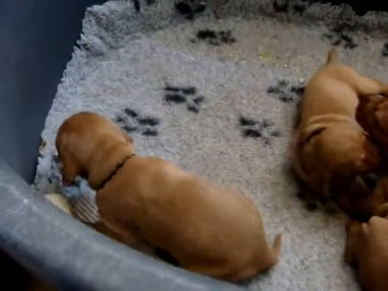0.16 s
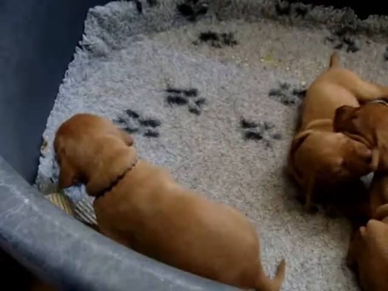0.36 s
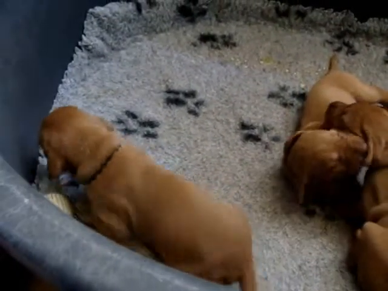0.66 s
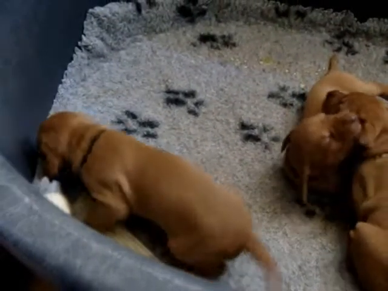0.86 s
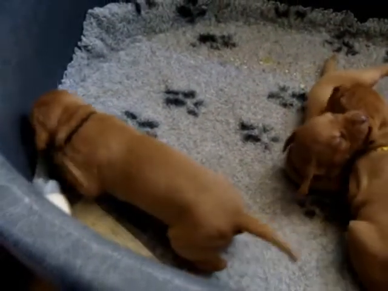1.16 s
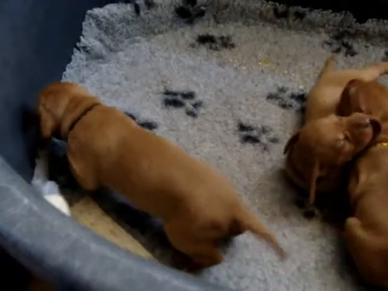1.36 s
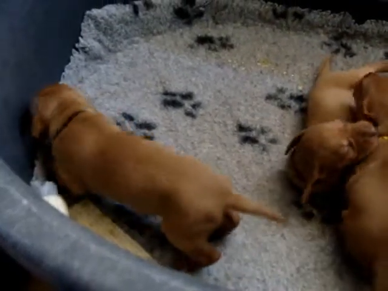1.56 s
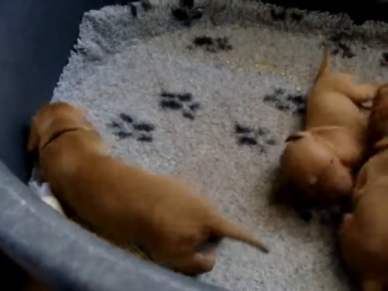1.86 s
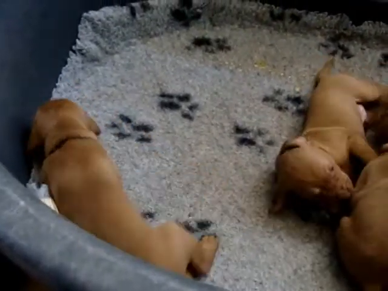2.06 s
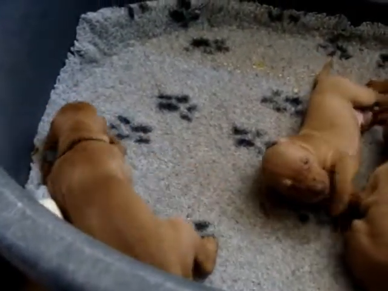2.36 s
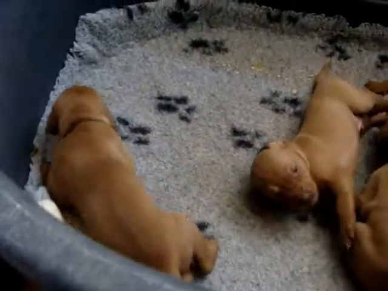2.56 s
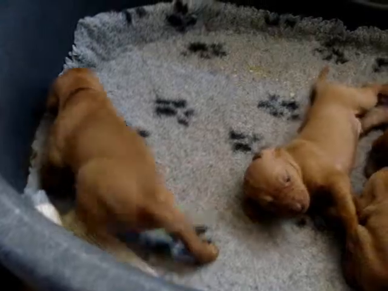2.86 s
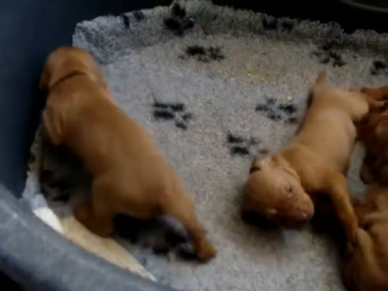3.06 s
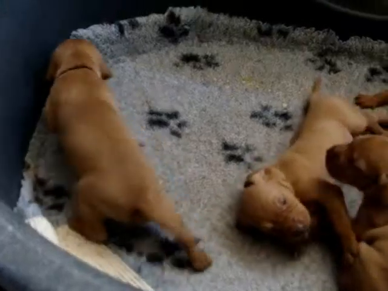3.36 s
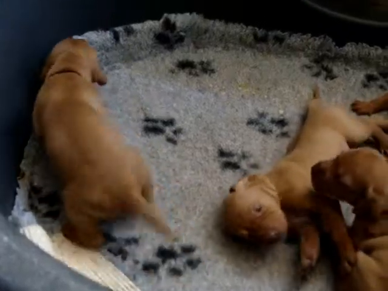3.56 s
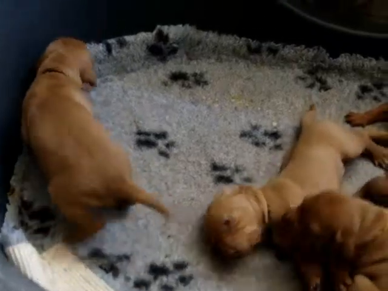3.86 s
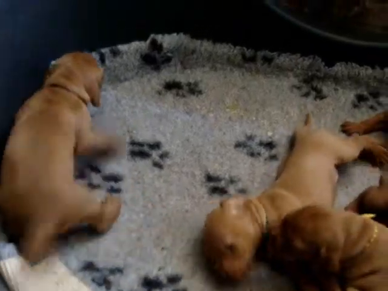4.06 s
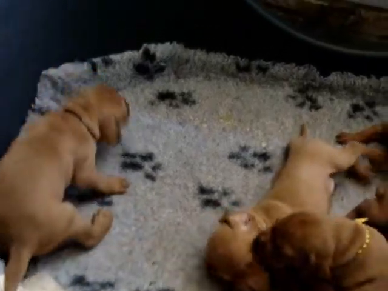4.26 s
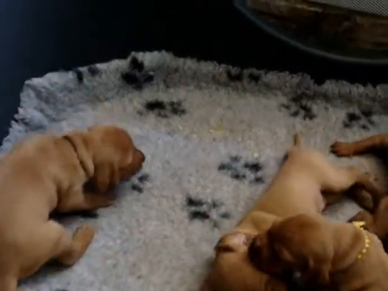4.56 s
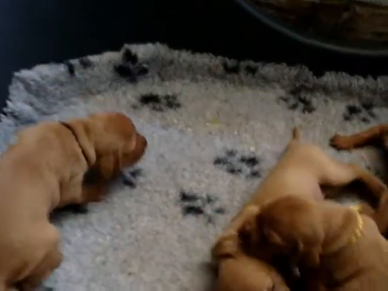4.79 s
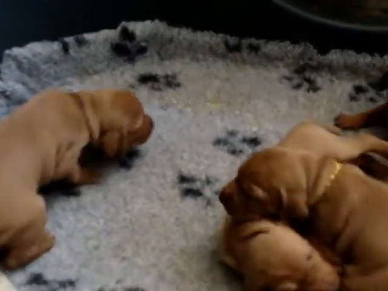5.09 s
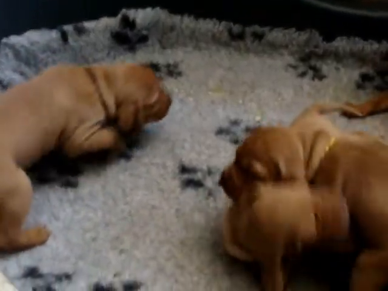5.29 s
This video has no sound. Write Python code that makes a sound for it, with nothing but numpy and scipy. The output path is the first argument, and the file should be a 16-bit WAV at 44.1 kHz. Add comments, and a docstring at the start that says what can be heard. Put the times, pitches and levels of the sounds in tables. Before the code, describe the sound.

Indoors, close to a plastic box padded with fleece, steady soft room noise runs throughout. In the first 0.7 s fur and paws scuff the blanket, claws tick on plastic, padded bumps land and a puppy whimpers very faintly. From 0.8 to 1.7 s come small throaty grumbles and grunts, with a brighter little woof at about 1.1 s and ticks near 1.4. Between 1.7 and 2.5 s rubbing, ticks and dull thumps at 2.2-2.4 suggest tumbling; two low, faint grunts follow at 2.6-2.7. At 2.85 s a sudden, extremely loud yelp rises to a shrill squeal, overloads the microphone, drops into a groan by 3.1 and rings briefly. Small grunts follow at 3.25 and 3.6 s. A trembling whine, broken into quick bursts, with a snarl beneath and ticks, spans 3.8-4.0. A low, rough growl falls and closes from 4.2 to 5.0 s. A soft thump and faint grumble end it at 5.2-5.5.

```python
"""Young puppies wrestle on a fleece blanket in a plastic whelping box, indoors.
They grumble, grunt and growl: pulses from the vocal folds ring in throats of changing shape.
One gives a sharp yelp, topped by a squeal, that rings in the room and overloads the microphone.
Paws scuff (shaped noise), bodies thump (dying sines), claws tick on the box (bursts of noise that ring),
and a littermate whimpers faintly (gliding tones) over a steady room tone."""
import sys
import numpy as np
from scipy import signal
from scipy.fft import rfft, irfft
from scipy.io import wavfile
from scipy.ndimage import uniform_filter1d, minimum_filter1d

SR = 44100
rng = np.random.default_rng(int(sys.argv[2]) if len(sys.argv) > 2 else 0)


def materialize(psi):
    """Save the field psi as 16-bit PCM at rate SR to the path in sys.argv[1].

    A 1-D psi becomes a single channel; in a 2-D psi each row is a channel.
    """
    bounded = np.clip(np.atleast_2d(psi).T, -1, 1)
    quanta = np.round(bounded * 32767).astype(np.int16)
    wavfile.write(sys.argv[1], SR, quanta)


N = 239497

# vocal folds in the yelp, the whine and the long growl: [t/s, f/Hz, roughness 0-1]
YELP_FOLDS = [(2.845, 345, .6), (2.878, 390, .6), (2.895, 590, .85), (2.92, 730, .72), (2.96, 690, .28),
              (2.98, 612, .15), (3.01, 435, .4), (3.06, 285, .6)]
WHINE_FOLDS = [(3.795, 520, .3), (3.82, 468, .3), (3.88, 415, .4), (3.92, 470, .9), (4.02, 435, .6)]
GROWL_FOLDS = [(4.19, 162, .65), (4.26, 175, .4), (4.31, 172, .75), (4.44, 175, .6), (4.52, 152, .85),
               (4.61, 148, .6), (4.68, 140, .35), (4.76, 135, .45), (4.85, 148, .12), (4.98, 126, .1)]
# effort of those calls, before voice() trims each band; the whine's levels are those at its tremor crests:
# [t/s, throat level/dB below 1 kHz, mouth level/dB at 1-3.2 kHz, hiss level/dB above]
YELP_EFFORT = [(2.845, -21.5, -64, -81), (2.862, -5, -38, -62), (2.887, -10.5, -8, -15.5),
               (2.909, -57, -6, -14), (2.954, -28, -16.5, -20), (2.981, -28.5, -10.5, -48),
               (2.992, -28, -41, -34), (3.018, -22, -22, -37.5), (3.06, -44, -28, -40)]
WHINE_EFFORT = [(3.798, -13.5, -33, -65), (3.821, -20.5, -41.5, -40), (3.882, -20.5, -38, -33.5),
                (3.899, -30, -34.5, -38), (3.975, -18, -42, -50), (4.019, -30, -32, -43)]
GROWL_EFFORT = [(4.195, -34.5, -45, -50.5), (4.22, -30, -34, -50), (4.42, -31, -37.5, -52),
                (4.74, -36, -40, -50), (4.9, -35, -34.5, -54.5), (4.98, -50, -72, -61)]
# resonances of the throat and mouth, as relative spectra: [f/Hz, level/dB]
GRUMBLE_THROAT = [(71, -39), (120, -28), (155, -4), (198, -0.5), (292, 0.5), (623, -13), (736, 1),
                  (919, -21), (1210, -11.5), (1460, -19), (1720, -12.5), (2740, -35), (10000, -36),
                  (13000, -77), (22000, -120)]
WOOF_THROAT = [(110, -53), (200, -17), (370, -9.5), (560, -11.5), (740, -13.5), (950, -23.5), (1250, -17),
               (1600, -21.5), (2300, -40), (4100, -54), (5150, -35), (6400, -50), (8300, -37), (10000, -67)]
GRUNT_THROAT = [(88, -47), (150, 1), (282, 4.5), (387, 4.5), (591, -4.5), (782, -7), (869, -6.5),
                (1050, -17), (1150, -5), (1580, -13), (3420, -40), (8390, -37), (10000, -44), (13000, -87),
                (22000, -120)]
YELP_THROAT = [(150, -32), (380, -23.5), (500, -9), (670, 2.5), (800, -2.5), (1020, -7), (1240, -1),
               (1480, -5), (1700, 1), (2300, -12), (2560, -8.5), (2800, -11.5), (3300, -21.5),
               (4700, -22.5), (6500, -37), (10000, -55.5)]
GROAN_THROAT = [(100, -55), (170, -9), (284, -4), (600, -9.5), (762, -2.5), (968, -15), (1230, -1.5),
                (1950, -20), (2430, -22), (6530, -18), (10000, -46), (13000, -96), (22000, -120)]
HUFF_THROAT = [(76, -34), (130, 14.5), (187, 4), (255, 1), (341, 11), (731, 11.5), (1090, -5), (1650, -3.5),
               (2100, -7), (3360, -29.5), (4030, -25), (4500, -51), (5110, -27), (6700, -35), (10000, -32),
               (13000, -73), (22000, -120)]
WHINE_THROAT = [(150, -67), (250, -17), (379, 9.5), (449, -1), (661, -2.5), (736, -44), (1100, -15),
                (1410, -39), (1600, -19), (2300, -27), (2780, -20.5), (3720, -42), (4020, -34), (4840, -46),
                (6290, -40), (10000, -44), (13000, -93), (22000, -120)]
SNARL_THROAT = [(47, -56), (80, -20), (172, -8.5), (291, -7), (437, -4.5), (641, -9), (753, -11.5),
                (817, -16), (1200, -17.5), (1350, -21), (2530, -19), (3700, -34), (5300, -30), (5750, -28),
                (6160, -22), (6810, -35), (10000, -37), (13000, -99), (22000, -120)]
GROWL_THROAT = [(65, -76), (110, -15.5), (157, -1), (262, 5.5), (288, -2), (341, 10), (382, 7), (613, -3),
                (768, 2.5), (1120, -24), (1380, -26.5), (1540, -17.5), (1660, -24), (1860, -21.5),
                (2430, -29.5), (3220, -54.5), (5470, -46.5), (10000, -50.5), (13000, -75), (22000, -120)]
CLOSING_THROAT = [(100, -35), (140, -7), (270, 3), (420, 3.5), (560, -2.5), (850, -6.5), (1000, -19),
                  (1300, -30.5), (1600, -18.5), (2000, -37), (3200, -56), (5600, -32.5), (6700, -42.5),
                  (8000, -36), (10000, -50.5)]
# short growls and grunts, levels at full effort before the band trims:
# [start t/s, attack/s, hold/s, release/s, start f/Hz, top f/Hz, end f/Hz, roughness (1 is the most used),
#  throat level/dB, mouth level/dB, hiss level/dB, throat shape]
GRUNTS = [(0.788, 0.16, 0.026, 0.12, 139.8, 163, 144, 0.59, -41, -45.5, -56, GRUMBLE_THROAT),
          (0.967, 0.022, 0.062, 0.063, 152, 154, 133, 0.27, -46.5, -53.5, -53, GROWL_THROAT),
          (1.1, 0.033, .022, 0.054, 334.1, 384, 278, .55, -22, -34.5, -38.5, WOOF_THROAT),
          (1.371, .035, 0.047, 0.069, 237.8, 298, 210, 0.38, -27.5, -39.5, -49, GRUNT_THROAT),
          (1.569, 0.026, 0.016, 0.065, 205.2, 245, 150, 0.21, -33.5, -43.5, -49, GRUNT_THROAT),
          (1.66, 0.013, 0.034, 0.061, 168.4, 155, 132, 0.7, -44, -48, -54, GRUNT_THROAT),
          (2.609, 0.026, 0.049, 0.064, 59.74, 59, 48, 0.89, -43.5, -40.5, -60, GROWL_THROAT),
          (2.699, 0.022, 0.0052, 0.076, 128, 140, 117, 0.3, -35.5, -38, -53.5, GROWL_THROAT),
          (3.019, 0.031, .1, .045, 348, 272, 215, 1.1, -31.5, -36, -52.5, GROAN_THROAT),
          (3.243, 0.051, .012, 0.035, 120.3, 112, 100, 0.76, -40.5, -41.5, -58.5, GROWL_THROAT),
          (3.603, 0.012, 0.041, 0.058, 182.3, 183, 145, 0.3, -31, -38, -50.5, HUFF_THROAT),
          (3.887, 0.059, .06, .06, 66.12, 74, 68, 0.73, -27, -38.5, -38.5, SNARL_THROAT),
          (5.289, 0.03, 0.054, 0.12, 84.4, 77, 83, 0.31, -39.5, -43.5, -55.5, GROWL_THROAT)]
# second oscillation at the top of the yelp: [t/s, f/Hz, rms level/dB]
SQUEAL = [(2.882, 1027, -11.5), (2.9, 1175, -5), (2.923, 1197, -14), (2.949, 1229, -13), (2.967, 1289, -18),
          (2.978, 1239, -1.5), (2.991, 1200, -34)]
# thin whistles through the nose, level at the middle: [start t/s, length/s, start f/Hz, end f/Hz, level/dB]
WHIMPERS = [(.24, 0.043, 660, 590, -49.5), (.3, 0.075, 720, 745, -47.5), (.41, 0.042, 845, 760, -49),
            (3.87, 0.18, 2458, 2455, -43), (5.07, 0.15, 655, 635, -61)]
# claws and teeth, and a lip smack as the huff starts at 3.602 s: [t/s, reference level/dB, ring f/Hz, time to
# die by 60 dB/s]
TICKS = [(0.053, -25, 7250, 0.012), (0.08, -30.5, 7200, .03), (.108, -38, 6500, .02),
         (0.121, -27, 2400, 0.017), (0.733, -32, 3100, 0.099), (0.744, -28, 8340, 0.051),
         (0.743, -34, 3200, 0.041), (1.376, -32.5, 2620, 0.035), (1.462, -38, 5140, 0.14),
         (1.483, -25, 1990, 0.076), (1.957, -39.5, 3070, 0.1), (2.274, -24, 3500, 0.06),
         (2.532, -24.5, 3400, 0.026), (2.629, -29.5, 6700, 0.054), (3.173, -36.5, 4400, 0.078),
         (3.447, -53, 3370, 0.034), (3.485, -39, 2900, 0.071), (3.602, -25, 1100, 0.022),
         (3.891, -28, 5240, .06), (3.959, -27.5, 6030, 0.093)]
# paws and bodies landing: [t/s, reference level/dB, ring f/Hz, time to die by 60 dB/s]
THUMPS = [(0.045, -42, 204, 0.25), (0.226, -44, 293, 0.2), (0.486, -42, 168.5, 0.19),
          (0.641, -43, 233, 0.17), (1.83, -45.5, 137.6, 0.16), (2.227, -33.5, 81.5, 0.15),
          (2.269, -36, 324, 0.093), (2.39, -38.5, 320, 0.08), (3.388, -34, 590, 0.03),
          (4.14, -39, 744, 0.13), (5.211, -38, 222, 0.084)]
# rubbing on the blanket, before scuff() trims it: [middle t/s, length/s, dull level/dB, bright level/dB]
SCUFFS = [(0.008, 0.13, -38.5, -50.5), (0.116, .08, -54, -47), (0.496, 0.22, -46, -66),
          (0.661, 0.07, -43.5, -54), (0.756, 0.061, -47, -65), (1.726, 0.16, -44.5, -51.5),
          (1.993, 0.089, -49.5, -60), (2.131, .15, -46.5, -47), (2.279, 0.075, -38.5, -51.5),
          (2.399, 0.061, -52, -62), (2.477, 0.086, -58, -44)]
# relative spectra of the dull rub and of the bright fibres: [f/Hz, level/dB]
SCUFF_DULL = [(71, -25), (120, -8), (156, 4), (271, 8), (672, -4.5), (763, -1.5), (857, 0.5), (993, -35),
              (1080, -60), (1500, -3.5), (1950, -67), (3300, -120)]
SCUFF_BRIGHT = [(710, 1), (1200, 4), (1700, 3), (2170, 12), (3050, 2.5), (3540, -1.5), (7600, -3),
                (10000, -23), (13000, -72), (22000, -120)]
# first echoes off the box walls: [delay/s, level/dB]
WALL_ECHOES = [(.0029, -37), (.0074, -22.5), (.0116, -12)]
# time for the room's tail to die by 60 dB: [f/Hz, time/s]
ROOM_T60 = [(150, 0.56), (600, 0.38), (2000, 0.55), (8000, 0.04)]
# relative spectrum of the room tone: [f/Hz, level/dB]
ROOM_TONE = [(15, 1), (25, -2), (164, -4), (245, -0.5), (546, -4), (651, 6), (737, -2), (924, -2.5),
             (1250, -4), (1420, -5), (1600, -3.5), (2170, -5.5), (2930, -6.5), (3670, -9), (10000, -17),
             (13000, -111), (22000, -120)]

ROOM_TONE_DB = -49  # rms, ahead of record()
THROAT_TOP_HZ, MOUTH_TOP_HZ = 1000, 3200  # the voice's three bands meet here
TOP_HZ, CUTOFF_HZ = 10200, 15700  # steep upper edges, before and after the loud peaks are flattened
# the whine shakes: rate, depth in throat, mouth and hiss, delay of a crest from its start
WHINE_TREMOR_HZ, WHINE_TREMOR_DB, WHINE_CREST_S = 33.5, (14, 1, 19), 0.02
SWELL_DB, FADE_DB, FADE_CURVE = 10, 14.5, 0.87  # effort gained in attack, lost in release; its bend
MOUTH_FOLLOWS, HISS_FOLLOWS = 1.3, 1.0  # dB per dB of effort
SLACK_ROUGHNESS = 0.14  # extra roughness as the folds start and stop
PITCH_ARCH = 1.4  # 1 is a pointed arch, 2 a round one
ARCH_DB = 7  # whimpers and scuffs are this much weaker at their ends
FLUTTER_SHARE = .41  # rate of the slower vibration, as a share of the squeal's pitch


def cry(fold_rows, effort_rows, *throats):
    """A call whose pitch, roughness and effort change as it goes, through one or more throat shapes."""
    t, gate = span(effort_rows[0][0], effort_rows[-1][0])
    pitch, rough = curves(fold_rows, t)
    return t[0], gate * voice(t, pitch, rough, curves(effort_rows, t), throats)


def squeal(depth=0.2, octave=1.45, mellow_s=0.058, unsteady=0.021):
    """A high tone that starts shrill and mellows; a slower vibration chops it into side tones."""
    start = SQUEAL[0][0]
    t, gate = span(start, SQUEAL[-1][0])
    pitch, db = curves(SQUEAL, t)

    def unsteady_phase(hz):
        """Phase of a vibration whose pitch strays a little."""
        return 2 * np.pi * np.cumsum(hz * (1 + unsteady * wander(len(t), 180))) / SR

    phase = unsteady_phase(pitch)
    flutter = 1 + depth * np.sin(unsteady_phase(FLUTTER_SHARE * pitch))
    shrill = octave / (1 + ((t - start) / mellow_s) ** 4)
    tone = (np.sin(phase) + shrill * np.sin(2 * phase)) * flutter
    return t[0], rms_one(tone) * from_db(db) * gate


def whine():
    """A cry that a tremor of the throat breaks into bursts."""
    start = WHINE_EFFORT[0][0]
    t, gate = span(start, WHINE_EFFORT[-1][0])
    dip = np.sin(np.pi * WHINE_TREMOR_HZ * (t - start - WHINE_CREST_S)) ** 2
    levels = [db - depth * dip for db, depth in zip(curves(WHINE_EFFORT, t), WHINE_TREMOR_DB)]
    pitch, rough = curves(WHINE_FOLDS, t)
    return t[0], gate * voice(t, pitch, rough, levels, [WHINE_THROAT])


def grunt(start, attack, hold, release, start_hz, top_hz, end_hz, rough,
          throat_db, mouth_db, hiss_db, throat):
    """One push of air: effort swells, holds and fades; pitch bends, mouth follows, slack folds roughen."""
    top = start + attack + hold / 2
    end = start + attack + hold + release
    t, gate = span(start, end)
    rising = np.clip(1 - (t - start) / attack, 0, 1)
    fading = np.clip(1 - (end - t) / release, 0, 1)
    effort = -SWELL_DB * rising ** 2 - FADE_DB * fading ** FADE_CURVE
    before = np.clip((top - t) / (top - start), 0, 1)
    after = np.clip((t - top) / (end - top), 0, 1)
    pitch = top_hz + (start_hz - top_hz) * before ** PITCH_ARCH + (end_hz - top_hz) * after ** PITCH_ARCH
    roughness = np.clip(rough + SLACK_ROUGHNESS * (rising + fading), 0, 1)
    levels = throat_db + effort, mouth_db + MOUTH_FOLLOWS * effort, hiss_db + HISS_FOLLOWS * effort
    return t[0], gate * voice(t, pitch, roughness, levels, [throat])


def voice(t, pitch, rough, levels, throats, hiss_share=0.72, throat_db=1.5, mouth_db=-1.5, hiss_db=-1.5):
    """Fold pulses and hissing air ring in a throat that glides from shape to shape; effort sets three bands."""
    pulses, puffs = folds(t, pitch, rough)
    source = pulses + hiss_share * butter(puffs, 1750, "high")
    shape = np.linspace(0, len(throats) - 1, len(t))
    tone = 0
    for k, throat in enumerate(throats):
        tone = tone + colour(source, throat) * np.clip(1 - np.abs(shape - k), 0, 1)
    bands = [butter(tone, THROAT_TOP_HZ, "low", order=5),
             butter(tone, (THROAT_TOP_HZ, MOUTH_TOP_HZ), "band", order=4),
             butter(tone, MOUTH_TOP_HZ, "high", order=5)]
    # loudness follows the effort over a few cycles; single pulses stay uneven
    window = int(SR * np.clip(4 / np.median(pitch), .012, .04))
    out = 0
    for band, db, trim_db in zip(bands, levels, (throat_db, mouth_db, hiss_db)):
        power = uniform_filter1d(uniform_filter1d(band ** 2, window), window)
        gain = from_db(uniform_filter1d(db, size=130) + trim_db)
        out = out + gain * band / np.sqrt(np.abs(power) + 1e-14)
    return out


def folds(t, pitch, rough, shimmer_db=4, doubling=0.31, air=1.0):
    """One pulse a cycle; roughness unsettles time and strength, weakens every other one, lets air through."""
    jitter = .11 * rough * wander(len(t), np.mean(pitch) / 2)
    phase = np.cumsum(pitch * np.exp(jitter)) / SR
    at = np.flatnonzero(np.diff(np.floor(phase)))
    # each pulse falls between two samples and is shared by them
    late = (np.ceil(phase[at]) - phase[at]) / (phase[at + 1] - phase[at])
    shimmer = from_db(shimmer_db * rough[at] * rng.standard_normal(len(at)))
    strength = shimmer * np.sqrt(SR / pitch[at])
    strength *= 1 - np.clip(doubling * rough[at], 0, 1) * (np.arange(len(at)) % 2)
    pulses = np.zeros(len(t))
    pulses[at], pulses[at + 1] = strength * (1 - late), strength * late
    # air bursts out at each pulse and thins over the cycle
    puffs = rms_one(np.exp(-2 * (phase % 1)) * rng.standard_normal(len(t)))
    # the turbulence lies above the fundamental
    turbulence = butter(puffs, np.mean(pitch), "high")
    return pulses + air * rough * turbulence, puffs


def whimper(start, length, start_hz, end_hz, db, octave=0.16, unsteady_hz=13):
    """A thin, nearly pure tone that glides through the nose."""
    t, gain = arch(start, length)
    pitch = np.interp(t, [start, start + length], [start_hz, end_hz])
    pitch = pitch + unsteady_hz * wander(len(t), 60)
    phase = 2 * np.pi * np.cumsum(pitch) / SR
    tone = np.sin(phase) + octave * np.sin(2 * phase)
    return t[0], rms_one(tone) * from_db(db) * gain


def tick(start, db, hz, t60, width=1.15, ring_db=-9, crack_db=6, crack_s=0.00058):
    """A claw or tooth snaps onto hard plastic, or lips smack: a broad, very brief crack, then a narrow dying
    ring."""
    t = np.arange(SR // 6) / SR
    grit = rng.standard_normal(len(t))
    crack = from_db(crack_db) * butter(grit, [hz / 2, 2 * hz], "band") * np.exp(-t / crack_s)
    ring = rms_one(butter(grit, [hz / width, hz * width], "band"))
    return start, from_db(db) * (crack + ring * from_db(ring_db - 60 * t / t60))


def thump(start, db, hz, t60, rise_s=0.00076, fluff=0.25):
    """A soft landing rocks the padded floor of the box: a dying sine with some low noise."""
    t = np.arange(SR // 3) / SR
    rock = np.sin(2 * np.pi * hz * t) + fluff * wander(len(t), 2 * hz)
    return start, rock * (1 - np.exp(-t / rise_s)) * from_db(db - 60 * t / t60)


def scuff(middle, length, dull, bright, lumpy_db=4.0, grain_db=3, dull_db=-3, bright_db=-3):
    """Fur and paws drag over fleece: a lumpy rub and a fine crackle of fibres."""
    t, gain = arch(middle - length / 2, length)
    rub = colour(rng.standard_normal(len(t)), SCUFF_DULL)
    rub = rub * from_db(lumpy_db * wander(len(t), 25))
    grains = rng.standard_normal(len(t)) * from_db(grain_db * wander(len(t), 200))
    fibres = colour(grains, SCUFF_BRIGHT)
    both = from_db(dull + dull_db) * rms_one(rub) + from_db(bright + bright_db) * rms_one(fibres)
    return t[0], gain * both


def room(x, scatter_db=-7, scatter_t60=0.018, tail_db=-13, delay_s=0.011):
    """Box walls echo, the litter scatters short waves, then the room's tail dies at a rate set by pitch."""
    t = np.arange(int(.7 * SR)) / SR
    scatter = rng.standard_normal(len(t)) * from_db(-60 * t / scatter_t60) * (t > .001)
    scatter = butter(scatter, 1100, "high")
    edges = np.geomspace(80, 11000, 8)
    tail = 0
    for low, high in zip(edges, edges[1:]):
        t60, = curves(ROOM_T60, np.sqrt(low * high))
        band = butter(rng.standard_normal(len(t)), [low, high], "band")
        tail = tail + band * from_db(-60 * t / t60) * (t > delay_s)
    # the tail fills only half of the spectrum
    tail = from_db(tail_db) * rms_one(tail) / np.sqrt(2)
    echo = (from_db(scatter_db) * rms_one(scatter) + tail) / np.sqrt(len(t))
    for s, db in WALL_ECHOES:
        add(echo, s, from_db([db]))
    return x + signal.fftconvolve(x, echo)[:N]


def room_tone():
    """The steady background of the place: noise with a fixed spectrum."""
    return from_db(ROOM_TONE_DB) * rms_one(colour(rng.standard_normal(N), ROOM_TONE))


def from_db(db):
    """Decibels to gain."""
    return 10 ** (np.asarray(db) / 20)


def rms_one(x):
    """Scale to rms 1."""
    return x / np.sqrt(np.mean(x ** 2) + 1e-20)


def curves(rows, t):
    """Columns of a table, joined by straight lines, at times t."""
    s, *columns = np.transpose(rows)
    return [np.interp(t, s, column) for column in columns]


def span(start, end, fade=0.0042):
    """Sample times around a sound, and a gate that is open during it."""
    first = max(0, int((start - .03) * SR))
    last = min(N, int((end + .03) * SR))
    t = np.arange(first, last) / SR
    opening = np.clip((t - start) / fade + .5, 0, 1)
    closing = np.clip((end - t) / (2 * fade) + 1, 0, 1)
    return t, opening * closing


def arch(start, length):
    """Sample times of a soft sound, and a gain that swells and sinks over its length."""
    t, gate = span(start, start + length)
    return t, gate * from_db(-ARCH_DB * (2 * (t - start) / length - 1) ** 2)


def add(out, start, x):
    """Mix x in at a time."""
    i = int(round(start * SR))
    out[i:i + len(x)] += x[:N - i]


def butter(x, hz, kind, order=2):
    """Causal Butterworth filter."""
    return signal.sosfilt(signal.butter(order, hz, kind, fs=SR, output="sos"), x)


def wander(size, hz):
    """Slow chance with spread 1: noise below hz, taken after the filter has settled."""
    return rms_one(butter(rng.standard_normal(size + SR // 4), hz, "low")[-size:])


def colour(x, spectrum, size=4096):
    """Pass x through a causal (minimum-phase) body with this spectrum."""
    hz, db = np.transpose(spectrum)
    grid = np.maximum(np.fft.rfftfreq(size, 1 / SR), 1)
    gain = from_db(np.interp(np.log(grid), np.log(hz), db))
    # folding the cepstrum forward in time gives the minimum phase
    cepstrum = irfft(np.log(gain))
    cepstrum[1:size // 2] *= 2
    cepstrum[size // 2 + 1:] = 0
    response = irfft(np.exp(rfft(cepstrum)))
    return signal.fftconvolve(x, response)[:len(x)]


def scene():
    """The litter in its box, over the tone of the room."""
    sounds = [cry(YELP_FOLDS, YELP_EFFORT, YELP_THROAT), squeal(), whine(),
              cry(GROWL_FOLDS, GROWL_EFFORT, GROWL_THROAT, CLOSING_THROAT)]
    sources = (grunt, GRUNTS), (whimper, WHIMPERS), (tick, TICKS), (thump, THUMPS), (scuff, SCUFFS)
    for source, rows in sources:
        sounds += [source(*row) for row in rows]
    litter = np.zeros(N)
    for start, sound in sounds:
        add(litter, start, sound)
    return (room(litter) + room_tone())[None]


def record(dry, limit=1.104, ceiling=0.9, size=180):
    """The sound ends steeply at 10.2 kHz; loud peaks are ducked and flattened, which adds treble up to
    15.7 kHz; rumble is cut."""
    heard = signal.sosfilt(signal.ellip(8, .3, 70, TOP_HZ, fs=SR, output="sos"), dry)
    # a fast limiter: the lowest gain nearby, smoothed
    duck = limit / np.maximum(np.abs(heard), limit)
    heard = heard * uniform_filter1d(minimum_filter1d(duck, size), size)
    flattened = heard / (1 + (heard / ceiling) ** 12) ** (1 / 12)
    flattened = butter(flattened, 30, "high")
    return signal.sosfilt(signal.ellip(10, .1, 80, CUTOFF_HZ, fs=SR, output="sos"), flattened)


dry = scene()
out = record(dry)
materialize(out)
```